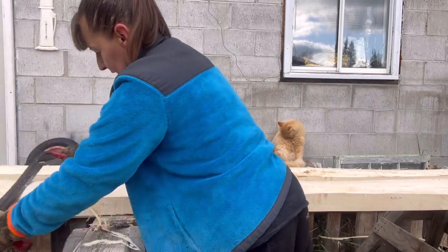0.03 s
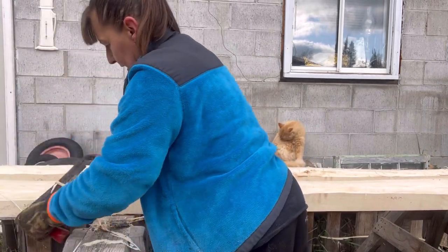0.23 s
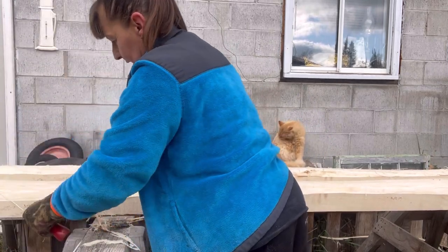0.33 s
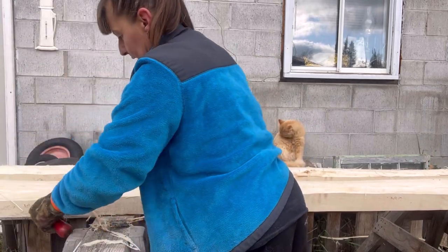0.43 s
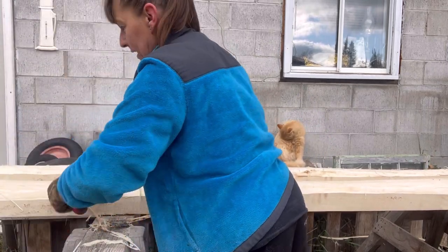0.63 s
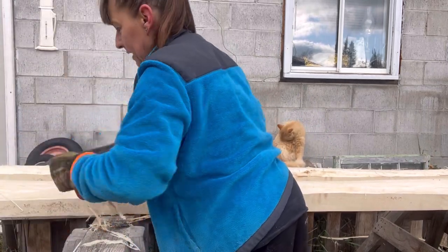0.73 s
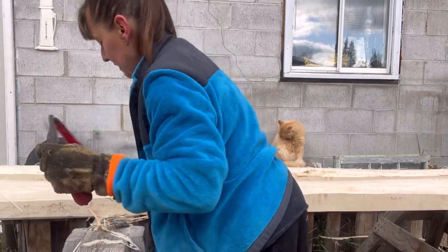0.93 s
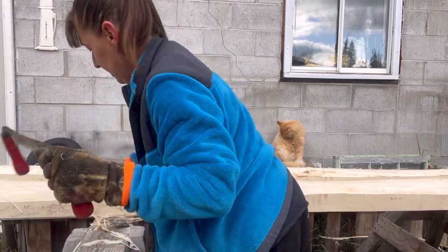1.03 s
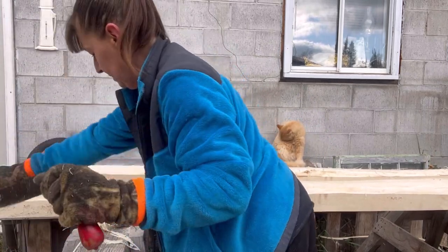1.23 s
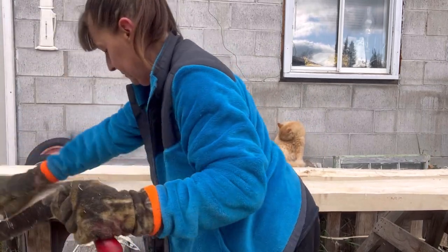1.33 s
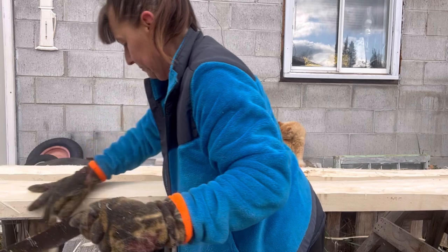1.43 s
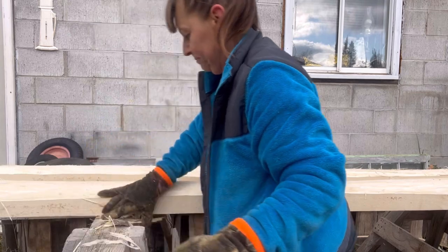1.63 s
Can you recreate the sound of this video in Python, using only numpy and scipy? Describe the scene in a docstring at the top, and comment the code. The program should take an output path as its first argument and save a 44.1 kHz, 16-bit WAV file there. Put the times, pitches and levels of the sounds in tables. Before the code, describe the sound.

A drawknife hisses along a log and ends in a hard woody knock, then gloves rustle outdoors

```python
"""Outdoors by a block wall, a drawknife is pulled along a peeled log. The blade slides in as grainy hiss with
faint notes, then knocks on the wood: decaying sine modes. The log settles on its trestle in lower knocks while
shavings tick as short noise bursts; then sleeves and gloves rustle, again as grainy hiss, and a glove brushes
the log with faint knocks. Throughout, a low hum of far traffic and air lies under it as coloured noise, and
two microphone ports colour everything."""
import sys
import numpy as np
from scipy import signal
from scipy.fft import rfft, irfft
from scipy.io import wavfile

SR = 44100
rng = np.random.default_rng(int(sys.argv[2]) if len(sys.argv) > 2 else 0)


def put_to_file(sound):
    """Save the sound as 16-bit audio at rate SR, in the file named by the first command-line argument."""
    columns = np.atleast_2d(sound).T  # one column per channel
    safe = np.clip(columns, -1, 1)
    whole_steps = np.round(safe * 32767)
    wavfile.write(sys.argv[1], SR, whole_steps.astype(np.int16))


N = 74970
HZ = np.maximum(np.arange(N // 2 + 1) * SR / N, 1)  # the pitch of every spectrum bin


def amp(db):
    """Decibels to gain."""
    return 10 ** (np.asarray(db) / 20)


def unit(x):
    """Scale to rms one."""
    return x / np.sqrt(np.mean(x ** 2) + 1e-20)


def in_time(rows):
    """Columns of a time table, one value per sample."""
    seconds, *columns = np.transpose(rows)
    return [np.interp(np.arange(N) / SR, seconds, column) for column in columns]


def in_hz(rows, hz=HZ):
    """Columns of a frequency table, read on a log frequency axis."""
    table_hz, *columns = np.transpose(rows)
    return [np.interp(np.log(hz), np.log(table_hz), column) for column in columns]


def bell(hz, centre_hz, octaves):
    """Weight that falls off either side of a centre pitch."""
    return np.exp(-.5 * (np.log2(hz / centre_hz) / octaves) ** 2)


def drift(rate_hz):
    """Random wander of spread one: noise through two equal low-pass poles."""
    pole = np.exp(-2 * np.pi * rate_hz / SR)
    wander = signal.lfilter([1], [1, -2 * pole, pole * pole], rng.standard_normal(N + SR))
    return unit(wander[SR:])  # the first second lets the filter settle


def spread(one, other, db, alike):
    """Colour two unrelated signals and mix them into a left and a right of given likeness."""
    alike = np.clip(alike, 0, 1)
    middle = np.sqrt(1 + alike) * rfft(one) * amp(db)
    side = np.sqrt(1 - alike) * rfft(other) * amp(db)
    return irfft([middle + side, middle - side], N)


# Knocks on the log. Each row: start in seconds, level in dB, centre of the struck modes in Hz, width in octaves.
KNOCKS = [(0.2108, -12.5, 2080, 1.6), (0.2138, -16, 1170, 1), (0.2166, -17, 1014, 0.89),
          (0.2247, -20.5, 420, 0.97), (0.2341, -42, 900, 1.2), (0.2417, -31, 491, 1.5),
          (0.26, -30, 124.3, .6), (0.283, -40.5, 126.8, .8), (.315, -45, 120, .6),
          (0.3719, -28.5, 312, 0.32), (.372, -37, 560, .35), (.395, -35, 300, 0.23),
          (0.391, -37.5, 125, 0.47), (.505, -41.5, 132.5, 0.5), (1.427, -50.5, 510, 1.4),
          (1.438, -46, 195, 1.8), (1.457, -49, 1260, 0.35), (1.4934, -35.5, 500, 0.7),
          (1.5033, -43, 1140, 5), (1.678, -41, 161, .9)]
# Modes of the log on its trestle. Each row: pitch in Hz, level in dB, time to fall 60 dB in seconds.
LOG_MODES = [(122.5, -9, 0.24), (193.27, -1, .06), (310.3, -6, 0.091), (430, -3.5, 0.047),
             (617, -7.5, 0.033), (799, -7.5, 0.028), (1085, 1.4, .026), (1165, -2, .035), (1387, 0, 0.025),
             (1755, -6.5, 0.029), (2006, -10, .03), (2477, -3, 0.05), (2985, 0.5, 0.011),
             (4015, -9.5, 0.022), (6015, -13, .014)]
MODE_SPREAD_DB = 1  # chance in each mode's level, knock by knock
RISE_CYCLES = 0.21  # time constant, in cycles of the mode, for the contact to set it going


def knocks():
    """Each knock sets ringing the modes of the log near its centre pitch."""
    out = np.zeros(N)
    t = np.arange(SR // 2) / SR
    for start, db, centre_hz, octaves in KNOCKS:
        ring = np.zeros(len(t))
        for k, (hz, mode_db, t60) in enumerate(LOG_MODES):
            struck = (-1) ** k * bell(hz, centre_hz, octaves)  # neighbouring modes start in opposite directions
            decay = amp(mode_db + MODE_SPREAD_DB * rng.standard_normal() - 60 * t / t60)
            rise = 1 - np.exp(-t * hz / RISE_CYCLES)
            ring += struck * decay * rise * np.sin(2 * np.pi * hz * t)
        i = int(start * SR)
        out[i:i + len(t)] += amp(db) * ring[:N - i]
    return out


# Short cracks of fibres and dry shavings.
# Each row: start in seconds, level in dB, length in seconds (the peak comes halfway), centre in Hz.
CRACKLES = [(.0388, -63, .004, 6000), (0.173, -48.5, 0.01, 8500), (0.201, -57.5, 0.0074, 8500),
            (.2102, -31, 0.0023, 3600), (.2103, -36, .004, 5600), (.2103, -38, .0025, 8200),
            (.2103, -44, 0.0053, 14000), (.256, -79, .004, 8000), (0.283, -67.5, .004, 8100),
            (0.3378, -49.5, 0.0043, 8300), (0.368, -52.5, 0.0052, 8000), (0.377, -71.5, .012, 6100),
            (0.466, -54.5, 0.011, 8500), (0.479, -57.5, 0.0035, 8000), (0.653, -71, 0.0082, 7010),
            (.7407, -79, 0.0033, 5000), (.7547, -62, .002, 6500), (.8415, -62.5, 0.001924, 4200),
            (1.4925, -47, 0.0022, 3800), (1.5022, -38.5, 0.0034, 4720)]
CRACKLE_OCTAVES = .38


def crackles():
    """Fibres snap: short noise bursts with quick rounded envelopes, each with its own pitch."""
    t, out = np.arange(N) / SR, 0
    grit = rfft(spread(*rng.standard_normal((2, N)), 0, in_hz(PORTS)[3]))
    for start, db, length, centre_hz in CRACKLES:
        u = np.maximum(t - start, 0) / length
        envelope = 2 * np.e * u * np.exp(-2 * u)
        burst = unit(irfft(grit * bell(HZ, centre_hz, CRACKLE_OCTAVES), N))
        out = out + amp(db) * envelope * burst
    return out


GRAINS_PER_S, GRAIN_SPREAD_DB = 8000, 2.5


def grains():
    """Dense tiny slips of uneven size and random direction."""
    sizes = amp(GRAIN_SPREAD_DB * np.minimum(rng.exponential(1, N), 5))
    signs = rng.choice([-1, 1], N)
    slips = rng.random(N) < GRAINS_PER_S / SR
    return unit(sizes * signs * slips)


def rubbed(spectrum, gain):
    """Many slips heard as grainy noise of a given colour under a level curve."""
    return gain * unit(spread(grains(), grains(), in_hz(spectrum)[0], in_hz(PORTS)[3]))


# Rubbing of blade, cloth and gloves.
# Each row: time in seconds, level of the fine hiss in dB, of the coarse hiss in dB, of the body in dB.
RUB_LEVELS = [(0, -74, -63.5, -68), (.025, -66.5, -73, -71.5), (.118, -52, -57.5, -62.5),
              (.188, -49, -63.5, -58.5), (.25, -73, -61.5, -52), (.326, -93, -84.5, -58.5),
              (.4, -63, -86, -64.5), (.45, -75, -84, -73.5), (.55, -76.5, -81.5, -73),
              (.71, -91, -82, -78.5), (.832, -81, -102, -81), (.9, -70, -71, -66.5),
              (0.952, -61.5, -66.5, -60), (1.008, -57, -65, -63.5), (1.112, -50.5, -55, -55.5),
              (1.2, -54, -56.5, -59), (1.24, -63, -64.5, -66.5), (1.33, -53.5, -58.5, -70.5),
              (1.361, -56.5, -59, -59.5), (1.414, -54.5, -60, -60), (1.434, -50.5, -55.5, -62),
              (1.482, -46, -51, -57.5), (1.52, -44.5, -48, -55.5), (1.58, -43.5, -52, -59),
              (1.632, -49.5, -51, -63), (1.684, -58, -61.5, -59), (1.7, -63, -59, -59)]
# Colours of the fine hiss, the coarse hiss and the body. Each row: pitch in Hz, relative level in dB per Hz.
FINE = [(5000, -32), (6500, -9.5), (8000, 4.6), (10000, -1.5), (12000, 1.5), (15000, -12.5)]
COARSE = [(2200, -23.5), (3200, -8.5), (4200, -4), (5200, -2.4), (6200, -5), (7500, -27.5)]
BODY = [(200, -20), (500, -22), (900, -1.5), (1400, -1.5), (2200, -4), (3000, -3.5), (4000, -16.5)]
# Level of the sliding blade's notes. Each row: time in seconds, level in dB.
BLADE_LEVEL = [(.04, -82), (.09, -58), (.15, -60.5), (.205, -55), (.212, -100)]
# What the sliding blade excites. Each row: pitch in Hz, half width in Hz, relative level in dB.
BLADE_NOTES = [(355, 40, -4), (850, 50, -4), (1240, 40, -5), (1385, 20, -1.5), (1520, 40, -8.5),
               (1800, 50, -9.5)]
RUB_FLICKER_DB = 1.1


def rubbing():
    """Two hisses and the body of the rubbing, flickering partly together, with the blade's faint notes."""
    together, layers = drift(6.3), 0
    for colour, db in zip((FINE, COARSE, BODY), in_time(RUB_LEVELS)):
        flicker_db = RUB_FLICKER_DB * (1.1 * together + drift(35))
        layers = layers + rubbed(colour, amp(db + flicker_db))
    resonance = sum(amp(db) / (1 + ((HZ - hz) / width_hz) ** 2) for hz, width_hz, db in BLADE_NOTES)
    notes = unit(irfft(rfft(grains()) * resonance, N))
    return layers + amp(in_time(BLADE_LEVEL)[0]) * notes


# Dying away of the returns. Each row: pitch in Hz, time to fall 60 dB in seconds.
WALL_T60 = [(100, .15), (500, .25), (1500, 0.15), (4000, 0.14), (10000, 0.24)]
WALL_DB = -14


def yard(x):
    """Scattered returns from wall and ground: octave bands of dying noise, unrelated left and right."""
    t, tail = np.arange(SR // 2) / SR, 0
    for hz in 125 * 2. ** np.arange(7):
        octave = signal.butter(2, [hz / 1.41, hz * 1.41], "band", fs=SR, output="sos")
        band = signal.sosfilt(octave, rng.standard_normal((2, len(t))))
        decay = amp(-60 * t / in_hz(WALL_T60, hz)[0])
        tail = tail + band * decay * (t > .004)  # nothing returns in the first 4 ms
    tail = tail / np.sqrt(np.mean(np.sum(tail ** 2, axis=1)))
    return amp(WALL_DB) * signal.fftconvolve(x, tail, axes=1)[:, :N]


# Colours of the hum and of the rumble under it. Each row: pitch in Hz, relative level in dB per Hz.
HUM = [(200, -38.5), (260, -7), (310, -7), (433, -14.5), (587, -15), (800, -17), (1110, -20.5), (1700, -26),
       (2410, -47.5), (5000, -37.5), (6600, -69.5), (11000, -53), (15000, -47.5)]
RUMBLE = [(12, -42), (20, -18), (38, -6.5), (108, -4.5), (146, -5.5), (166, -16), (182, -10.5), (241, -9.5),
          (260, -12.5), (340, -47.5), (570, -120)]
# Their levels. Each row: time in seconds, level in dB.
HUM_LEVEL = [(0.0, -61.5), (0.142, -61), (0.306, -57.5), (0.374, -54.5), (0.562, -60.5), (0.71, -61.5),
             (1.23, -62.5), (1.438, -58.5), (1.618, -58), (1.7, -63)]
RUMBLE_LEVEL = [(0.0, -56.5), (0.232, -55), (0.364, -55), (0.582, -58.5), (0.89, -56.5), (1.22, -60),
                (1.556, -56.5), (1.7, -54.5)]
HUM_FLICKER_DB, RUMBLE_FLICKER_DB = 1, 1.5


def background(colour, level, flicker_db):
    """Wide coloured noise whose level follows a curve and flickers."""
    noise = spread(*rng.standard_normal((2, N)), in_hz(colour)[0], in_hz(PORTS)[4])
    return amp(in_time(level)[0] + flicker_db * drift(24)) * unit(noise)


def hum():
    """Far traffic and air: a wide, dull hum over a lumpy rumble."""
    dull = background(HUM, HUM_LEVEL, HUM_FLICKER_DB)
    lumpy = background(RUMBLE, RUMBLE_LEVEL, RUMBLE_FLICKER_DB)
    return dull + lumpy


def scene():
    """All sources as they reach the two ports; only knocks and crackles get returns from the yard."""
    wood = knocks() + crackles()
    return wood + yard(wood) + rubbing() + hum()


# The two microphone ports; the sources above take their likeness of left and right from here.
# Each row: pitch in Hz, shared colour in dB, right over left in dB, lag of right in radians,
# likeness of near sounds from 0 to 1, likeness of far sounds from 0 to 1.
PORTS = [(20, 0, 2, 0, .75, .7), (300, 0, 3, .2, .8, .6), (700, 0, 1, .4, .1, .1), (1300, 0, 2, .3, .7, .1),
         (2500, 0, 5, 1.5, .65, .2), (3600, -2, 2, 1.6, .6, .3), (4400, -1, 8, 2.1, .5, .4),
         (5050, 3, 11, 2.1, .6, .6), (5500, 0.1, 9, 2, .6, .5), (6000, -2, 3, 1.6, .6, .5),
         (6800, -5, -4, 1.6, .65, .5), (8200, 4, -2.5, 2.1, .95, .93), (9300, -4, -.5, 2.6, .85, .8),
         (10300, -3, 0, np.pi, 1, 1), (11200, -13, 0, np.pi, 1, 1), (12600, -24, 0, np.pi, 1, 1),
         (13600, -19, 0, 3.6, .8, .7), (14600, -15, 0, 4.5, .6, .7), (15600, -17, 0, 5.5, .5, .6)]
CUTOFF_HZ = 16300  # from here up everything is at least 70 dB down


def record(dry):
    """Each port has its own colour and lag; the top is cut."""
    colour_db, tilt_db, lag, *_ = in_hz(PORTS)
    left = amp(colour_db - tilt_db / 2) * np.exp(.5j * lag)
    right = amp(colour_db + tilt_db / 2) * np.exp(-.5j * lag)
    ported = irfft(rfft(dry) * [left, right], N)
    return signal.sosfilt(signal.cheby2(14, 70, CUTOFF_HZ, fs=SR, output="sos"), ported)


dry = scene()
out = record(dry)
put_to_file(out)
```